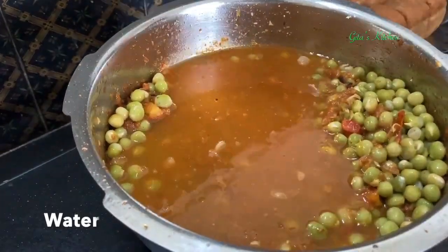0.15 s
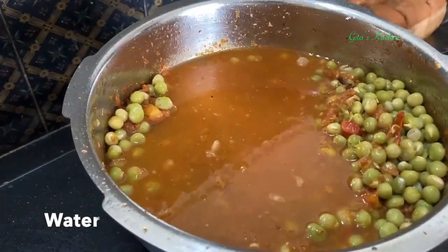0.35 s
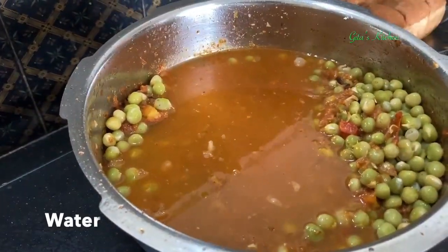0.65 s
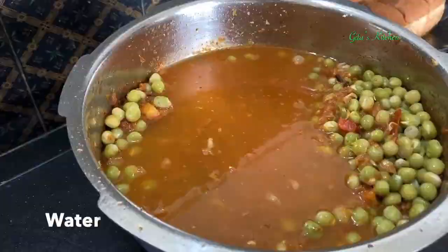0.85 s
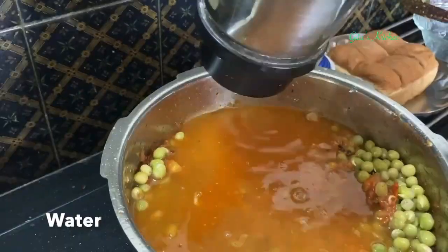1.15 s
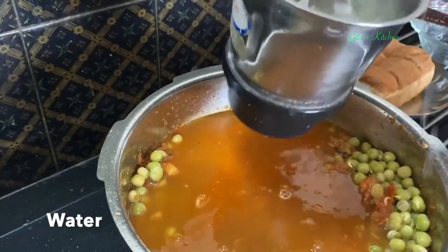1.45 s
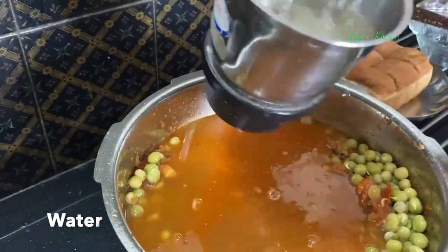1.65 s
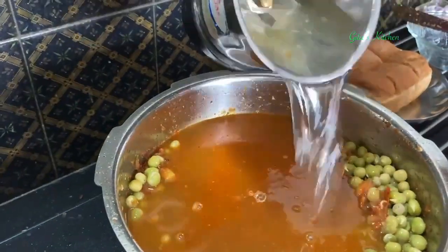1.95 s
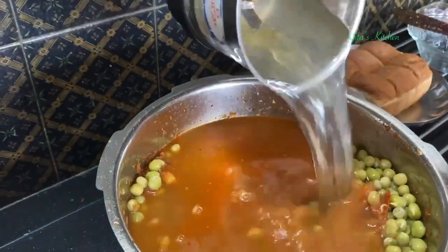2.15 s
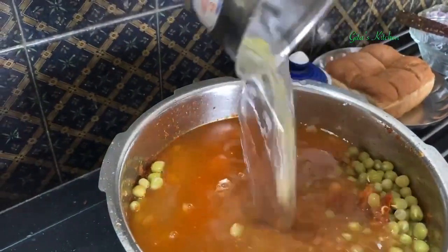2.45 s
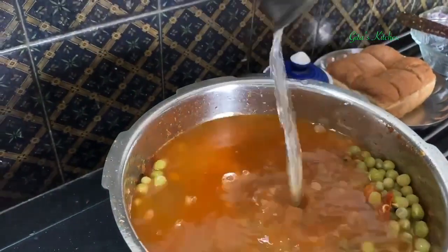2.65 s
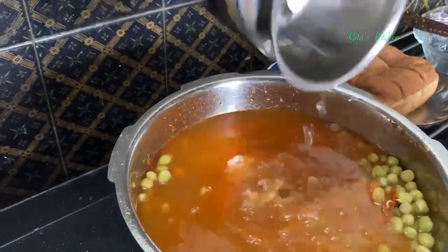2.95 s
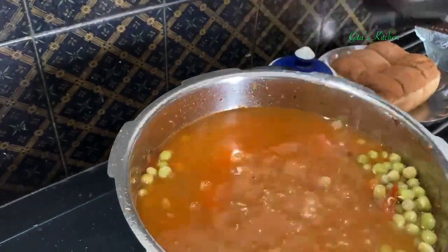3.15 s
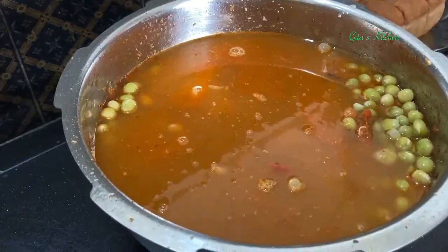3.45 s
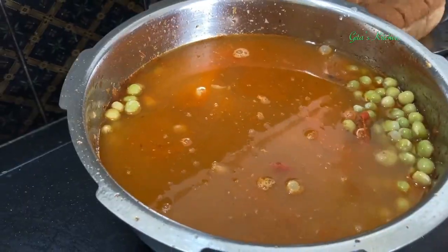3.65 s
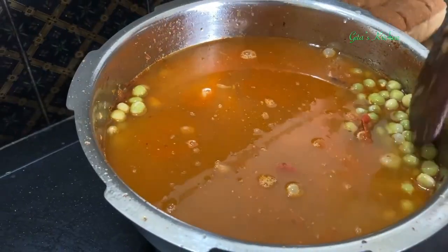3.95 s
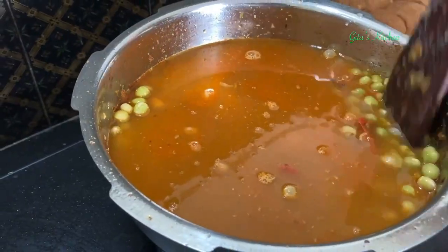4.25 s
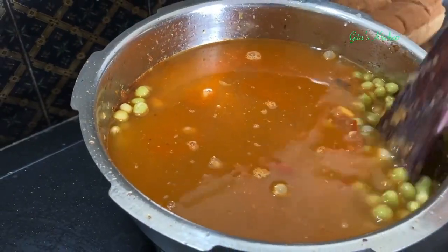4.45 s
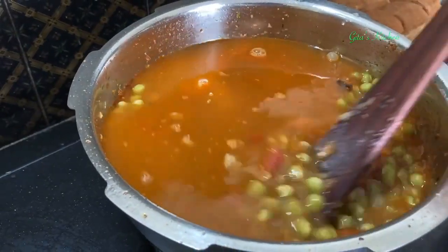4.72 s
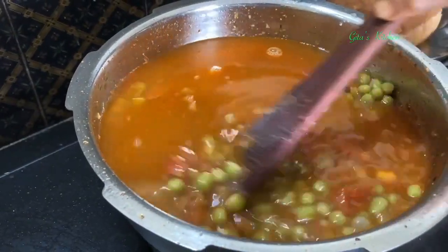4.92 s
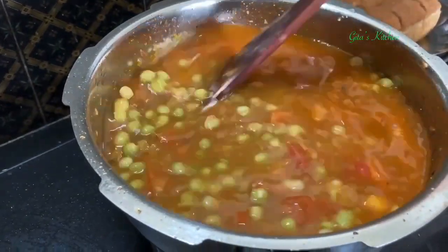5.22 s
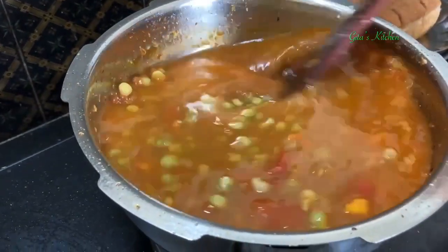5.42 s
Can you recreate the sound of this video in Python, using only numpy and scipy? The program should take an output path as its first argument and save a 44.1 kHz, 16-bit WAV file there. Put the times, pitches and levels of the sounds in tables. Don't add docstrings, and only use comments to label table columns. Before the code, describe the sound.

Close handheld microphone at a steel pot: steady fine simmering, a brief gap, sparse bubbles and faint ringing slosh, then a short, crackling, bubbly pour of water with popping froth. The jar hits the rim very loudly and is cut off. Quiet room rumble and a few small ticks follow, then wood bumps and sings along the steel wall as gravy swishes.

```python
import sys
import numpy as np
from scipy import signal
from scipy.fft import rfft, irfft
from scipy.io import wavfile
from scipy.ndimage import uniform_filter1d

SR = 44100
rng = np.random.default_rng(int(sys.argv[2]) if len(sys.argv) > 2 else 0)


def makeup_ratio(level_db):
    decades = np.asarray(level_db, float) / 20
    return 10 ** decades


def generate_wav(signal):
    frames = np.transpose(np.atleast_2d(signal))
    scaled = np.clip(frames, -1, 1) * 32767
    pcm = np.round(scaled).astype(np.int16)
    wavfile.write(sys.argv[1], SR, pcm)


N = 246078
CUT_S = 3.2184


def evened(x):
    return x / np.sqrt(np.mean(x ** 2) + 1e-20)


def read(points, hz):
    f, value = np.transpose(points)
    return np.interp(np.log(hz + 1), np.log(f + 1), value)


def columns(rows, t):
    s, *rest = np.transpose(rows)
    return [np.interp(t, s, c) for c in rest]


def add(mix, s, sound):
    part = mix[round(s * SR):][:len(sound)]
    part += sound[:len(part)]


def slope(t, start, length):
    return np.clip((t - start) / max(length, .001), 0, 1)


def resonate(x, hz, width):
    turn = np.exp(2j * np.pi * np.cumsum(hz * np.ones(len(x))) / SR)
    r = np.exp(-np.pi * width / SR)
    return 2 * (turn * signal.lfilter([1 - r], [1, -r], x / turn)).real


def resonate_twice(x, hz, width):
    return resonate(resonate(x, hz, width), hz, width)


def boom(hz, width, steady=0.78):
    ring = evened(resonate(resonate(rng.standard_normal(N), hz, width), hz, 2 * width))
    lumps = np.sqrt(uniform_filter1d(ring ** 2, size=1500) + .02)
    return evened(ring / lumps ** steady)


def kitchen(x, t60=0.7, wet_db=-12):
    t = np.arange(9000) / SR
    tail = rng.standard_normal(9000) * makeup_ratio(-60 * t / t60) * (t > .003)
    return x + makeup_ratio(wet_db) * signal.oaconvolve(x, tail / np.linalg.norm(tail))[:N]


# low edge in Hz, high edge in Hz.
BANDS_HZ = [
    (2900, 9500),
    (450, 2900),
    (9500, 15800),
]
# frequency in Hz, level in dB per Hz.
POT_COLOURS = [
    [(180, -42), (300, -11.5), (1230, -12.5), (1420, -2), (1890, -6.5), (2120, -2), (2380, -12),
     (2900, -17), (3660, -4), (4320, -2), (6020, -16.5), (7470, -4.5), (9420, -14), (11500, -3.5),
     (15700, -15.5)],
    [(180, -47), (300, -35), (385, -23), (572, -3.5), (1060, -8), (1630, -1), (2160, -5.5), (2340, -4),
     (2950, -11), (4390, -0.5), (5400, -4.5), (6600, -12.5), (7700, -4.5), (8500, -7), (10400, -16),
     (11900, -10), (15700, -16)],
    [(180, -28), (300, -12.5), (680, -11), (1330, -10.5), (2300, -15.5), (3100, -19.5), (4600, -16),
     (6600, -21.5), (7800, -16.5), (9700, -26.5), (11400, -20), (13500, -33), (15700, -25)],
    [(180, -23), (300, 0), (418, -12.5), (710, -2.5), (941, -7.5), (1680, -1), (2260, -3.5), (2810, -10),
     (3980, 1), (4930, -1), (6220, -8.5), (7850, 1), (9730, -16), (11500, -12), (15700, -20)],
]
DROP_SHARES = [.08, .14, .04, .09]
# body in dB, share followed, air in dB, share followed.
FOLLOW = [
    (-39.5, 0.54, -44, 1.08),
    (-42.5, 0.4, -43.5, 0.67),
    (-45, 0.14, -53, 0.23),
    (-40.5, 0.68, -47, 1.1),
]
# start in s, sprays from in s, end in s, edge in s, body gain in dB,
# air change while thin in dB.
PLUNGE = (1.77, 2, 2.58, .05, 5, -2.5)


def hiss(liquid, effort_rows):
    smooth, burst = rng.standard_normal((2, N))
    drops = rng.random(N) < 900 / SR
    drops = evened(burst * signal.lfilter([1], [1, -.97], drops))
    share = DROP_SHARES[liquid]
    fizz = np.sqrt(1 - share) * smooth + np.sqrt(share) * drops
    hz, t, z = signal.stft(evened(kitchen(fizz, t60=0.1, wet_db=-11)), SR, nperseg=512, noverlap=384)

    start, wide, end, edge, deep_db, dull_db = PLUNGE
    plunge, thin = (slope(t, start, edge) - slope(t, s - edge, edge) for s in (end, wide))
    effort_db = columns(effort_rows, t)[0]
    over_db = effort_db + 38
    body_db, body_share, air_db, air_share = FOLLOW[liquid]
    levels_db = (effort_db,
                 body_db + body_share * over_db + deep_db * plunge,
                 air_db + air_share * over_db + dull_db * thin)

    shape_db = read(POT_COLOURS[liquid], hz)
    fizz_lift, body_lift, air_lift = [
        db - 10 * np.log10(np.mean(makeup_ratio(2 * shape_db) * (hz > lo) * (hz < hi)))
        for db, (lo, hi) in zip(levels_db, BANDS_HZ)]
    low = np.clip((3600 - hz) / 1400, 0, 1)[:, None]
    high = np.clip((hz - 8500) / 2000, 0, 1)[:, None]
    level_db = shape_db[:, None] + (1 - low - high) * fizz_lift + low * body_lift + high * air_lift

    patches = uniform_filter1d(rng.standard_normal(z.shape), size=3, axis=0)
    patches = evened(uniform_filter1d(patches, size=24, axis=1))
    flicker = evened(uniform_filter1d(rng.standard_normal(len(t)), size=8))
    z = z * makeup_ratio(level_db + 2 * patches + 0.86 * flicker)
    return signal.istft(z, SR, nperseg=512, noverlap=384)[1][:N]


# time in s, effort in dB.
SIMMER_EFFORT = [(0.02, -29.5), (0.5, -33.5), (0.72, -37.5), (0.82, -34.5)]


def simmer():
    return hiss(0, SIMMER_EFFORT)


# frequency in Hz, level in dB per Hz.
ROOM_COLOUR = [(12, -40), (24, -17), (48, -3.5), (64, -5.5), (90, -9), (124, -2.5), (241, -15), (286, -12),
               (340, -14.5), (370, -22.5), (600, -21.5), (780, -73), (1320, -120)]
# time in s, peak in dB, half length in s.
UPPER_BOOMS = [(0.412, -34.5, 0.16), (0.78, -28, 0.11), (0.932, -38.5, .06), (2.038, -35.5, 0.37),
               (2.586, -34.5, .08), (3.04, -40, .1), (4.2, -45.5, 0.22), (4.817, -37.5, 0.18)]
LOWER_BOOMS = [(.6, -53, 0.18), (1.0, -35, 0.12), (1.35, -40.5, 0.21), (1.95, -41, .15), (2.4, -35, 0.15),
               (2.9, -39.5, 0.16), (4.13, -38, .1), (4.56, -41, .07), (4.97, -30.5, 0.15),
               (5.22, -34, 0.042), (5.45, -35, 0.19)]


def swells(rest_db, rows):
    t = np.arange(N) / SR
    return makeup_ratio(rest_db) + sum(makeup_ratio(db) * np.exp(-((t - s) / half) ** 2) for s, db, half in rows)


def rumble(level_db, upper_db, lower_db):
    colour_db = read(ROOM_COLOUR, np.fft.rfftfreq(N, 1 / SR))
    low = evened(irfft(rfft(rng.standard_normal(N)) * makeup_ratio(colour_db), N))
    upper = swells(upper_db, UPPER_BOOMS) * makeup_ratio(-5) * boom(117.9, 14.6)
    lower = swells(lower_db, LOWER_BOOMS) * makeup_ratio(-4) * boom(60.8, 16)
    return makeup_ratio(level_db - 2) * low + upper + lower


# time in s, effort in dB.
POUR_EFFORT = [(0.94, -43.5), (1.345, -42.5), (1.375, -36), (1.5, -37.5), (1.62, -40), (1.77, -41),
               (1.82, -37), (2.06, -38), (2.14, -39), (2.19, -30), (2.27, -26.5), (2.36, -29.5),
               (2.52, -32.5), (2.6, -38), (2.8, -43), (2.92, -40), (3.16, -42.5)]


def pour():
    return hiss(1, POUR_EFFORT)


# start in s, peak in dB, pitch in Hz, t60 in s.
BUBBLES = [(0.916, -38.5, 1190, 0.051), (1.007, -36, 2400, .012), (1.017, -28, 800, 0.016),
           (1.041, -23.5, 740, 0.015), (1.107, -28.5, 1100, 0.012), (1.163, -26, 760, 0.016),
           (1.87, -22, 690, 0.046), (1.948, -16, 1830, 0.022), (1.955, -24.5, 623, 0.042),
           (2.018, -24, 670, 0.031), (2.0935, -14.5, 2310, 0.022), (2.09, -25.5, 675, 0.061),
           (2.096, -24, 1110, 0.018), (2.125, -30.5, 640, 0.04), (2.092, -15.5, 1330, 0.018),
           (2.195, -26, 2336, 0.05), (2.218, -21, 2314, 0.053), (2.216, -19.5, 658, 0.037),
           (2.223, -24, 608, 0.041), (2.311, -26, 1420, 0.03), (2.334, -21.5, 833, 0.076),
           (2.338, -24, 580, 0.047), (2.347, -11, 1530, 0.025), (2.405, -21, 1690, 0.042),
           (2.429, -22, 1150, 0.033), (2.454, -12.5, 542, 0.017), (2.483, -19, 526, 0.03),
           (2.519, -19.5, 563, 0.02), (2.552, -22.5, 463, 0.039), (2.603, -26, 1195, 0.018),
           (2.754, -30, 1345, 0.041),
           (1.8197, -22, 1570, 0.025), (1.8312, -23, 1750, 0.021), (1.833, -35, 700, .04),
         (1.8567, -23, 1790, .015), (1.857, -30, 692, .04), (1.8726, -19, 2250, 0.029),
         (1.888, -29, 760, .04), (1.9155, -26, 1110, 0.024), (1.931, -30, 705, 0.044),
         (2.0178, -22, 2330, .03), (2.052, -32, 678, .04), (2.1689, -23, 1480, .02),
         (2.172, -37, 686, 0.027), (2.264, -28, 575, .05), (2.31, -28, 656, 0.042),
         (2.3141, -23, 2330, .03), (2.375, -30, 640, 0.062), (2.398, -29, 850, 0.037),
         (2.427, -25, 960, .03), (2.4533, -22.5, 2350, .02), (2.5182, -19, 1510, .015),
         (2.5506, -24, 1460, 0.027), (2.578, -30, 477, .06), (1.412, -36, 2010, .12)]
# start in s, peak in dB, pitch in Hz, t60 in s.
BUMPS = [(4.047, -35, 620, 0.018), (4.049, -29.5, 306, 0.053), (4.124, -27, 365, 0.046),
         (4.132, -30, 238, 0.054), (4.143, -26.5, 286, 0.068), (4.191, -35, 340, 0.085),
         (4.655, -35, 280, 0.04), (5.2, -30.5, 900, 0.018)]
# start in s, peak in dB, pitch in Hz.
CATCHES = [(4.047, -36, 1100), (4.093, -35, 1060), (4.105, -30, 1120), (4.115, -35, 2100),
           (4.243, -31, 1240), (4.326, -33, 1720), (4.389, -33, 2010), (4.467, -30, 1090),
           (4.498, -33, 1710), (4.52, -33, 1090), (4.613, -34, 1570), (4.652, -36, 1200),
           (4.669, -32, 1190), (4.699, -31, 1210), (4.729, -34.5, 1140)]
CATCH_T60_S = .028
# time in s, level in dB.
GURGLE = [(1.8, -57), (1.86, -39), (2.0, -45), (2.15, -51), (2.22, -49), (2.4, -37.5), (2.55, -33.5),
          (2.66, -44)]


def bubble(hz, t60, rise=0.12):
    t = np.arange(4000) / SR
    phase = 2 * np.pi * hz * (t + rise * t ** 2 / (2 * t60))
    pop = 0.42 * np.sin(2.53 * phase) + 0.58 * np.sin(1.58 * phase) + 0.24 * np.sin(0.69 * phase)
    ring = makeup_ratio(-60 * t / t60) * np.sin(phase)
    return (1 - np.exp(-t / 0.0012)) * (ring + np.exp(-t / 0.0017) * pop)


def bubbles():
    large, small, t = np.zeros(N), np.zeros(N), np.arange(N) / SR
    wobble = uniform_filter1d(uniform_filter1d(rng.standard_normal(N), size=70), size=40)
    churn = 1 + 0.35 * evened(wobble)
    for s, db, hz, t60 in BUBBLES + BUMPS + [(*row, CATCH_T60_S) for row in CATCHES]:
        add(large, s, makeup_ratio(db + 2) * bubble(hz, t60))
    for hz in np.geomspace(520, 2400, num=24):
        strengths = makeup_ratio(3.2 * np.minimum(rng.exponential(1, N), 2))
        starts = strengths * (rng.random(N) < 45 / SR)
        one = bubble(hz, 24 / hz, rng.uniform(-.05, 0.29)) * (600 / hz) ** 0.39
        small += signal.oaconvolve(starts, one)[:N]
    running = (t > GURGLE[0][0]) & (t < GURGLE[-1][0])
    return large * churn + running * makeup_ratio(columns(GURGLE, t)[0] - 4) * evened(small)


# time in s, level in dB, resonance in Hz.
SLOSH = [(.93, -55, 4440), (1.05, -47, 4400), (1.14, -42, 4420), (1.2, -50, 4500), (1.23, -49, 4900),
         (1.33, -50, 4930), (1.39, -43, 5050), (1.45, -43, 4980), (1.5, -53, 5050), (1.58, -47, 5180),
         (1.8, -54, 5200)]


def slosh():
    t = np.arange(N) / SR
    level_db, hz = columns(SLOSH, t)
    fizz = rng.standard_normal(N)
    mouth = evened(resonate_twice(fizz, hz, 260))
    lower = makeup_ratio(-12) * evened(resonate(fizz, 0.5 * hz, 160))
    return makeup_ratio(level_db - 0.5) * (mouth + lower) * (t > SLOSH[0][0]) * (t < SLOSH[-1][0])


# start in s, peak in dB, loudest in Hz, wide spray in relative dB.
SPLATS = [(1.169, -28, 2860, -8), (1.7978, -20.5, 2700, 5), (1.802, -23, 3050, -1), (1.823, -26, 3500, 0),
          (2.11, -21, 2880, -1), (1.848, -22, 3700, -8), (2.0644, -27, 3280, -8), (2.093, -16, 3030, -11),
          (2.127, -18, 3000, -12), (2.141, -23, 3120, -10), (1.819, -19, 2300, -2), (1.8324, -19, 2290, -3),
          (1.847, -19, 7600, 4), (1.8705, -9, 4240, 0), (1.873, -11.5, 5250, -6), (1.9164, -18, 4360, 3),
          (1.922, -19, 4150, -11), (1.926, -21, 4200, -8), (1.936, -25, 4000, -10), (1.957, -22, 3900, -4),
          (2.0206, -10.5, 3980, -15), (2.0842, -9.5, 2340, -2), (2.0931, -10, 2300, -9),
          (2.105, -18, 3100, -8), (2.1157, -17, 2340, -7), (2.157, -17.5, 5100, -8),
          (2.2005, -16, 2320, -5), (2.221, -15, 5120, 1), (2.293, -18, 3750, -10), (2.529, -20, 4400, -4),
          (2.6627, -21.5, 4100, -5)]
DROPLETS = [(0.9966, -27, 13000, 3), (1.1393, -28, 5210, 1), (1.1715, -28, 5150, -14),
            (1.5106, -23, 7900, 4), (1.5535, -26, 12000, 5), (1.6567, -29, 4460, 4), (1.7909, -30, 7780, 0),
            (1.8024, -21, 7830, -1), (1.296, -23, 8550, 6), (1.866, -17, 7650, 0), (1.8735, -4.5, 7560, 5),
            (1.926, -20, 8600, -2), (2.8594, -31, 7940, 2), (2.9494, -27, 5030, -3),
            (3.5309, -39, 8000, -1.5), (3.6178, -20.5, 5000, 1), (3.7823, -40, 7920, -7),
            (3.8233, -35, 4900, -5), (3.8887, -32.5, 8550, -1.5), (3.9499, -42, 8010, -1.5),
            (4.37, -28, 5100, -8), (4.3873, -26, 4100, 2), (4.4986, -29, 2200, 9), (4.047, -34, 2600, 11),
            (4.572, -28, 4950, -3), (4.6009, -27, 8670, -2.5), (4.6588, -23, 5070, .3),
            (4.8274, -28, 7900, 0), (5.0403, -20, 3200, 11), (5.457, -15, 11000, 5),
            (4.84, -25.5, 1700, -5), (5.399, -19, 4900, 4), (4.31, -26, 4100, -10), (4.33, -25, 4200, -10)]
# as for splats, then t60 in s.
SNAPS = [(1.909, -9, 4010, -13, 0.011), (1.948, -9, 4300, 10, 0.013), (2.0097, -19, 9700, -4, .01),
         (2.0095, -20, 4300, -6, .012), (2.0148, -20, 11000, -3, .012), (2.034, -17, 4000, -7, 0.015),
         (2.0487, -20, 11400, -6, .01), (2.0905, -23, 7600, 0, 0.0092), (2.123, -23, 11800, -10, .02),
         (2.123, -16.5, 4170, -8, .02), (2.1302, -24, 13000, 0, .008), (2.132, -18, 4200, -8, .014),
         (2.1583, -20, 8150, -8, 0.013), (2.1625, -19, 8540, -8, .014), (2.166, -12, 5900, -14, 0.013),
         (2.1694, -9, 9470, 7, .008), (2.304, -14, 4500, -1, 0.0087), (2.3732, -12, 7300, -6, .018),
         (2.3905, -19, 4500, -11, .014), (2.3987, -9, 10500, 7, .006), (2.4068, -21, 9300, -8, .01),
         (2.4122, -21, 12000, -2, .008), (2.4428, -24, 12000, 2, .006), (2.4466, -12, 8800, -4, .007),
         (2.4535, -20, 5000, 2, .01), (2.463, -17, 5180, -12, .016), (2.4752, -11, 7900, -6, .016),
         (2.4762, -6.5, 11500, 2, .008), (2.475, -9, 7700, 0, .01), (2.4787, -15, 8200, -8, .014),
         (2.4905, -23, 8000, 0, .008)]
SLAP_T60_S = 0.02
SPRAY_FALL_DB, TILT_PER_OCTAVE_DB = 1.5, 4.5
CAVITY_ROUGH = .9


def splats():
    out, t, bins_hz = np.zeros(N), np.arange(3000) / SR, np.fft.rfftfreq(3000, 1 / SR)
    pot_db = read(POT_COLOURS[1], bins_hz) - 12 * np.clip(np.log2(1100 / (bins_hz + 1)), 0, 4)
    for s, db, hz, spray_db, t60 in [(*row, SLAP_T60_S) for row in SPLATS + DROPLETS] + SNAPS:
        spray_noise, ring_noise = rng.standard_normal((2, 3000))
        fade = makeup_ratio(-60 * t / t60) * (1 - np.exp(-t / (0.036 * t60))) ** 2
        tilt_db = TILT_PER_OCTAVE_DB * np.log2(hz / 4000) * np.log2(bins_hz / 4000 + 0.056)
        fall_db = SPRAY_FALL_DB * np.log2((bins_hz + 1) / hz) ** 2
        spray = evened(irfft(rfft(spray_noise) * makeup_ratio(pot_db + tilt_db - fall_db)))
        rough = evened(resonate(ring_noise, hz, 0.09 * hz))
        slap = fade * (np.sin(2 * np.pi * hz * t) + CAVITY_ROUGH * rough + makeup_ratio(spray_db) * spray)
        add(out, s, makeup_ratio(db - 2.5) * slap / np.max(abs(slap)))
    return out


# time in s, level in dB, resonance in Hz.
HOLLOW = [(1.33, -62, 1400), (1.38, -51, 1400), (1.53, -49, 1420), (1.6, -52, 1660), (1.72, -45, 1630),
          (1.82, -48, 1600), (1.86, -60, 1600)]


def hollow():
    t = np.arange(N) / SR
    level_db, hz = columns(HOLLOW, t)
    fizz = rng.standard_normal(N)
    hum = evened(resonate_twice(fizz, hz, 150))
    upper = makeup_ratio(-3) * evened(resonate_twice(fizz, 1.44 * hz, 130))
    return makeup_ratio(level_db) * (hum + upper) * (t > HOLLOW[0][0]) * (t < HOLLOW[-1][0])


# start in s, end in s, pops per second, level in dB, (small, large) in Hz, width in Hz.
FOAM = (2.2, 3.19, 40, -58, (8300, 12300), 2400)


def foam():
    start, end, per_s, level_db, sizes_hz, width = FOAM
    t, out = np.arange(N) / SR, np.zeros(N)
    for hz in sizes_hz:
        strengths = makeup_ratio(4.3 * np.minimum(rng.exponential(1, N), 2.5))
        pops = strengths * (rng.random(N) < per_s / SR) * (t > start) * (t < end)
        puffs = rng.standard_normal(N) * signal.lfilter([1], [1, -.975], pops)
        out += makeup_ratio(level_db) * evened(resonate_twice(puffs, hz, width))
    return out


# frequency in Hz, level in dB, t60 in s.
JAR_MODES = [(149, -28, .08), (1074, -6, .13), (1118, 2, .32), (1178, -16.5, .45), (1370, -12.5, .23),
             (1860, -10.5, .1), (2106, -12.5, .55), (2273, 5, .018), (2454, -15.5, .175), (2790, -24, .08),
             (3240, -10.5, .051), (3392, -15.5, .031), (4700, -13, .033), (5223, -25, .21)]
CLINK_S, CLINK_DB = 3.1925, 17


def clink():
    out, t = np.zeros(N), np.arange(round((CUT_S - CLINK_S) * SR)) / SR
    ring = np.zeros(len(t))
    for hz, db, t60 in JAR_MODES:
        swell = 1 - np.exp(-t * (hz / 1124) ** 3 / 0.0038)
        ring += makeup_ratio(db - 60 * t / t60) * swell * np.sin(2 * np.pi * hz * t)
    crack = makeup_ratio(-8.5 - 60 * t / 0.061) * signal.lfilter([.4], [1, -.6], rng.standard_normal(len(t)))
    add(out, CLINK_S, makeup_ratio(CLINK_DB - 13) * (ring + crack))
    return out


# time in s, effort in dB.
STILL_EFFORT = [(3.22, -53), (3.5, -52), (4.0, -55)]


def still():
    return hiss(2, STILL_EFFORT)


# start in s, pitch in Hz, t60 in s, level in dB.
PING = (3.427, 9290, .22, -43)
# start in s, attack in s, length in s, pressure in dB, change to the end in dB.
STROKES = [
    (4.04, .004, 0.23, -51.5, 5),
    (4.045, .04, 0.2, -55, 11),
    (4.043, 0.0073, 0.8, -52, 3.5),
    (4.24, .04, .38, -47, -8),
    (4.043, .004, .07, -49, -6),
    (4.3, .06, 0.14, -46, 2),
]
# frequency in Hz, width in Hz, level in dB.
WALL_MODES = [
    [(3560, 60, 2)],
    [(5080, 75, 4), (2320, 70, -2)],
    [(1095, 85, 1.5)],
    [(5110, 75, 5)],
    [(7420, 90, 0)],
    [(7770, 80, 0)],
]
STROKE_RISES = [.022, 0, .088, 0, 0, 0]
LIFT_S = 0.04


def spatula():
    t, out = np.arange(N) / SR, np.zeros(N)
    s, hz, t60, db = PING
    tp = t[:9000]
    add(out, s, makeup_ratio(db - 60 * tp / t60) * (1 - np.exp(-tp / 0.0016)) * np.sin(2 * np.pi * hz * tp))
    slips = makeup_ratio(1.9 * evened(uniform_filter1d(rng.standard_normal(N), size=900)))
    for (s, attack, length, pressure_db, change_db), modes, rise in zip(STROKES, WALL_MODES, STROKE_RISES):
        along = slope(t, s + attack, length - attack)
        touch = slope(t, s, attack) ** 2 * (1 - slope(t, s + length, LIFT_S))
        press = makeup_ratio(pressure_db + change_db * along) * touch
        for hz, width, db in modes:
            out += slips * press * makeup_ratio(db) * boom(hz * (1 + rise * along), width, steady=.65)
    return out


# time in s, effort in dB.
STIR_EFFORT = [(4.04, -64.5), (4.1, -47), (4.19, -44.5), (4.24, -37.5), (4.45, -38.5), (4.55, -40.5),
               (4.8, -41), (4.84, -38), (4.91, -38.5), (4.97, -33), (5.04, -35.5), (5.1, -39.5),
               (5.17, -40.5), (5.27, -36.5), (5.38, -33.5), (5.41, -34), (5.46, -30.5), (5.57, -33)]


def stir():
    return hiss(3, STIR_EFFORT)


# start in s, end in s.
SILENT_S = (.8516, .9148)


def by_shot(first, second, third):
    t = np.arange(N) / SR
    start, end = SILENT_S
    first = first * slope(-t, -start, .0006)
    later = np.where(t < CUT_S, second, third)
    return np.where(t < start, first, np.where(t < end, 0, later))


# rumble in dB, upper mode in dB, lower mode in dB.
RUMBLES_DB = [
    (-39, -44.5, -52),
    (-38, -45.5, -48),
    (-38.5, -52, -52),
]


def scene():
    low = [rumble(*row) for row in RUMBLES_DB]
    steady = by_shot(simmer() + low[0], pour() + low[1], still() + stir() + low[2])
    wet = kitchen(bubbles() + splats() + foam())
    return (steady + wet + slosh() + hollow() + clink() + spatula())[None]


def top_cut(x):
    return signal.sosfilt(signal.butter(12, 15890, fs=SR, output="sos"), x)


# start in s, gain in dB.
FADE = (3.2148, -5.5)


def record(dry):
    t = np.arange(N) / SR
    clipped = dry / (1 + abs(dry) ** 12) ** (1 / 12)
    start, step_db = FADE
    stepped = clipped * makeup_ratio(step_db * np.clip((t - start) / .0006, 0, 1) * (t < CUT_S))
    lowpass = signal.firwin(511, 15950, window=("kaiser", 9), fs=SR)
    band = signal.oaconvolve(stepped, lowpass[None], "same")
    return top_cut(band)


dry = scene()
out = record(dry)
generate_wav(out)
```